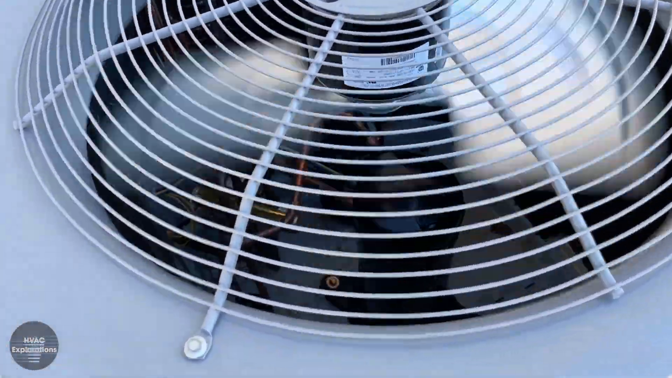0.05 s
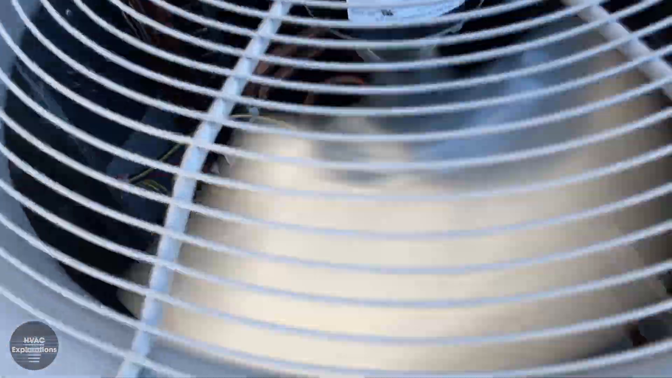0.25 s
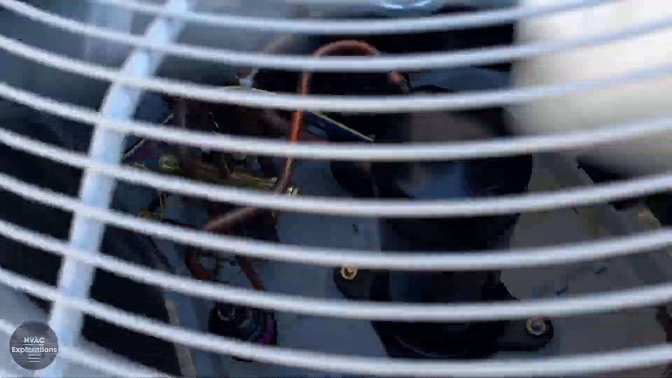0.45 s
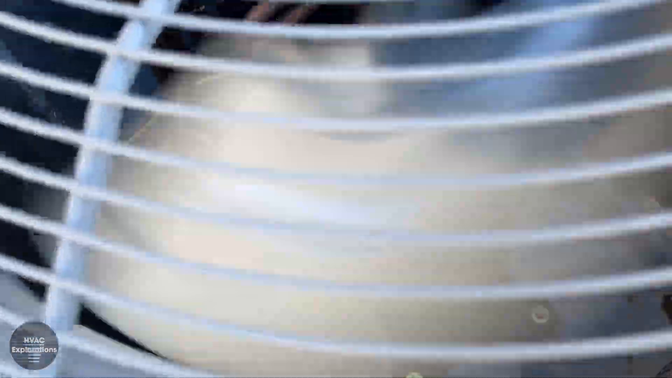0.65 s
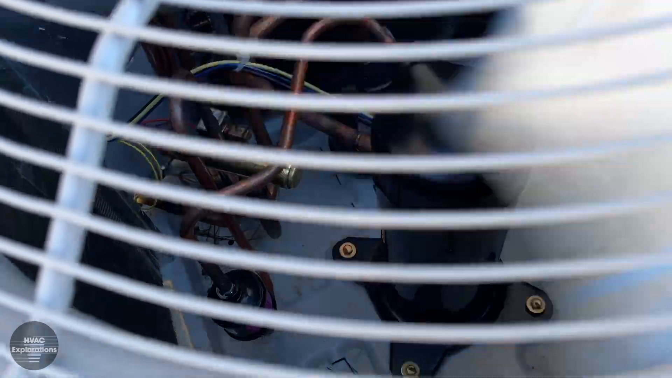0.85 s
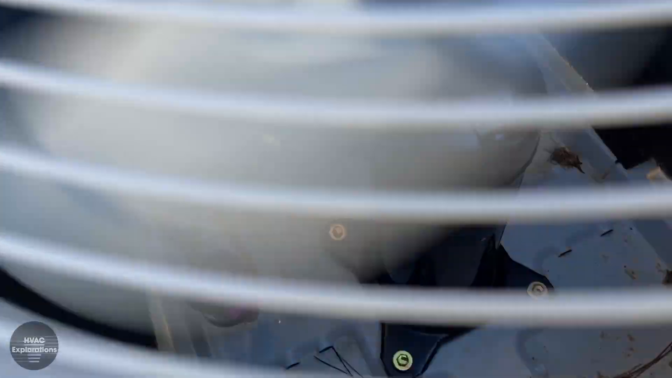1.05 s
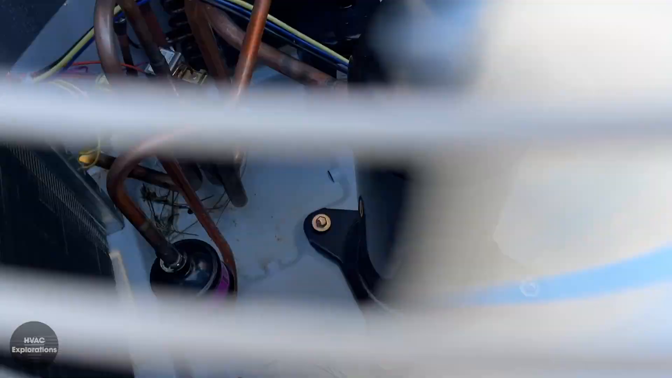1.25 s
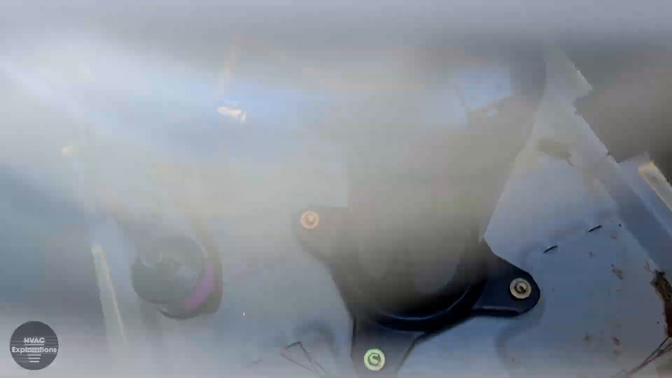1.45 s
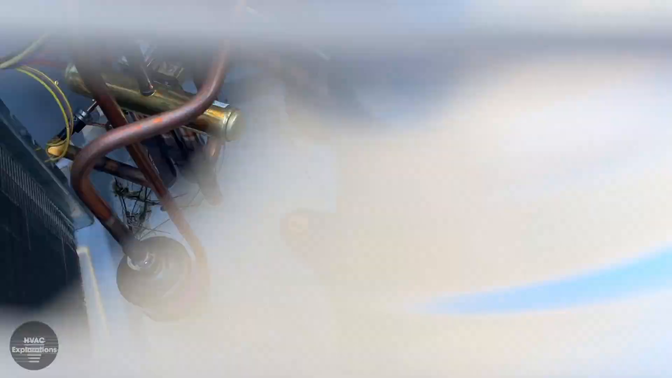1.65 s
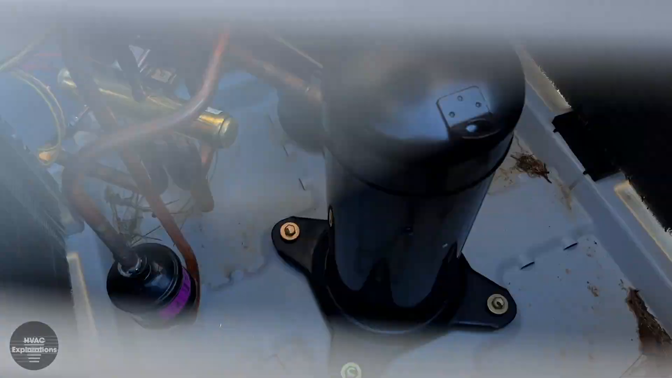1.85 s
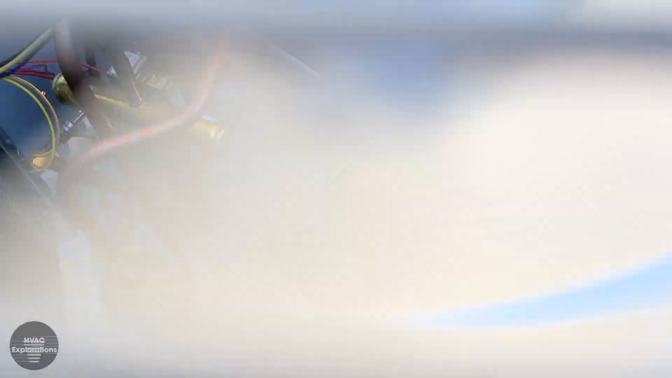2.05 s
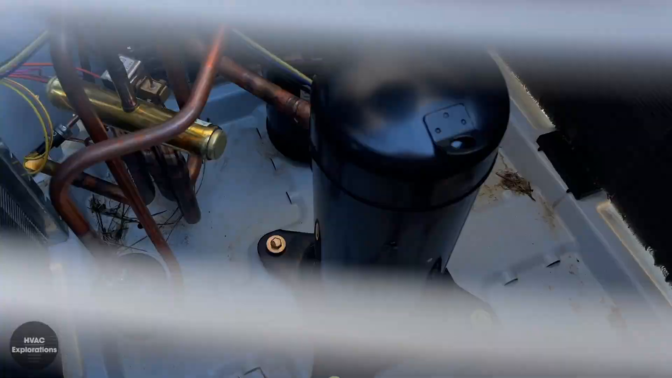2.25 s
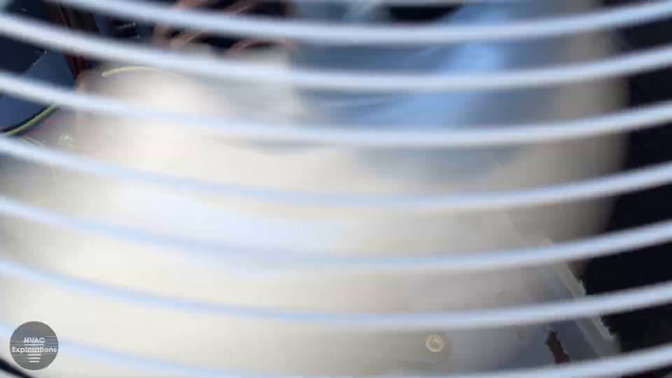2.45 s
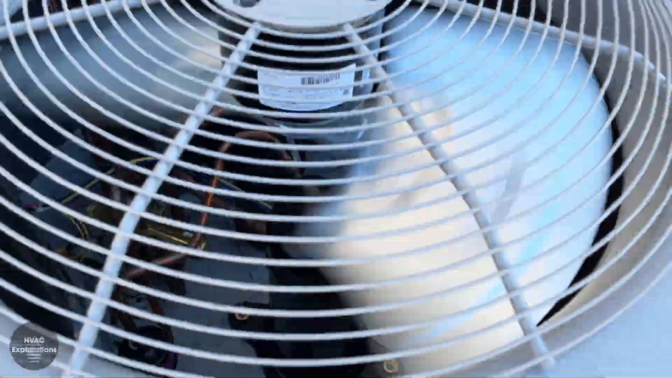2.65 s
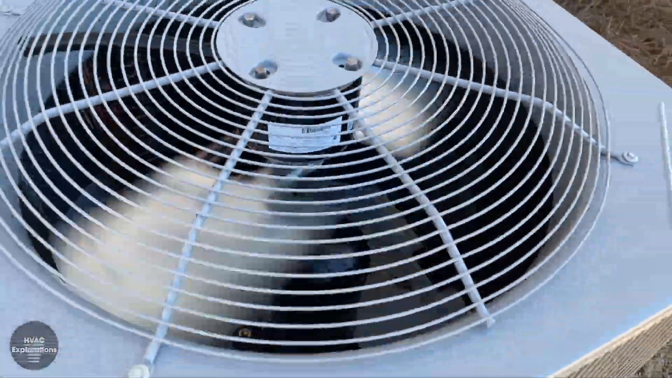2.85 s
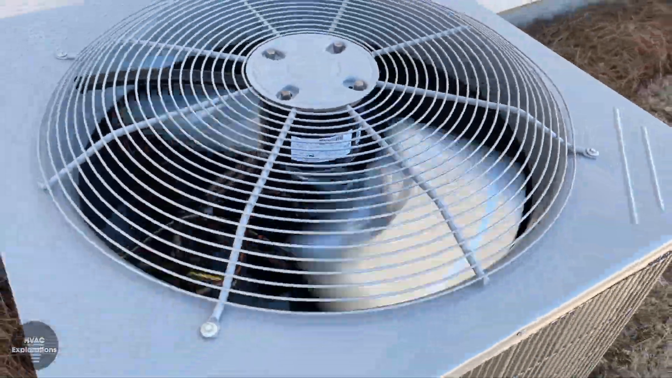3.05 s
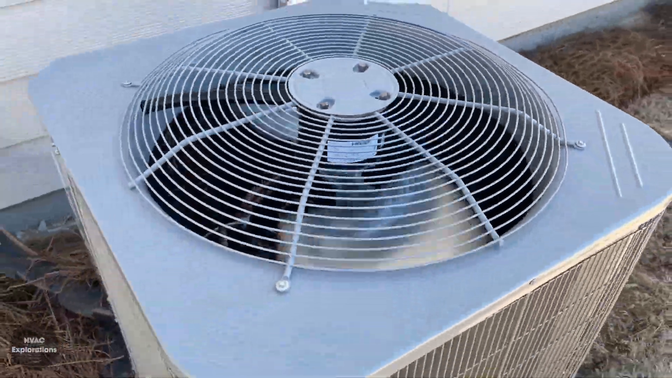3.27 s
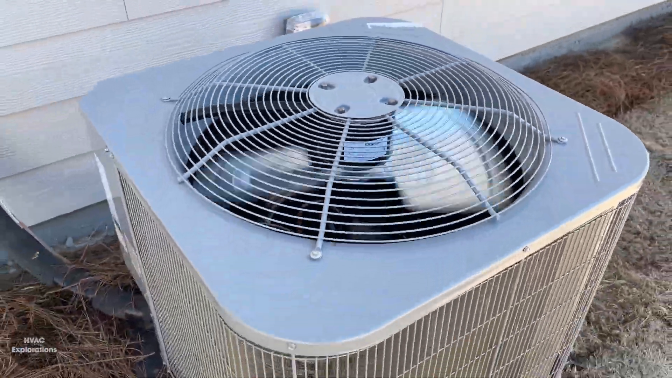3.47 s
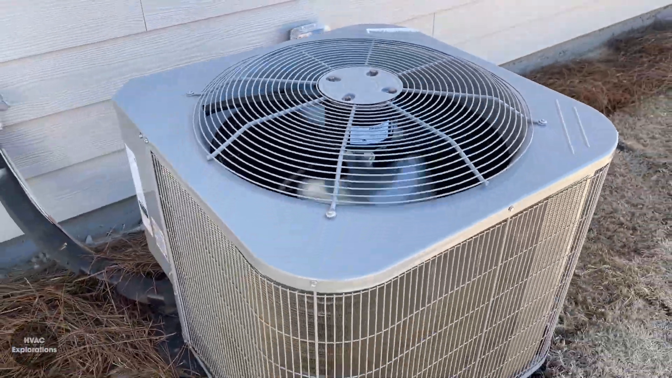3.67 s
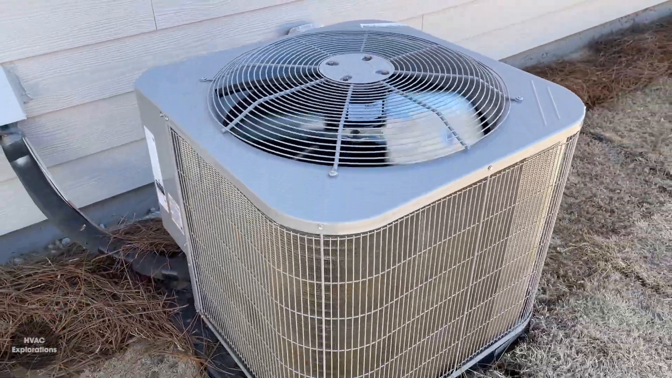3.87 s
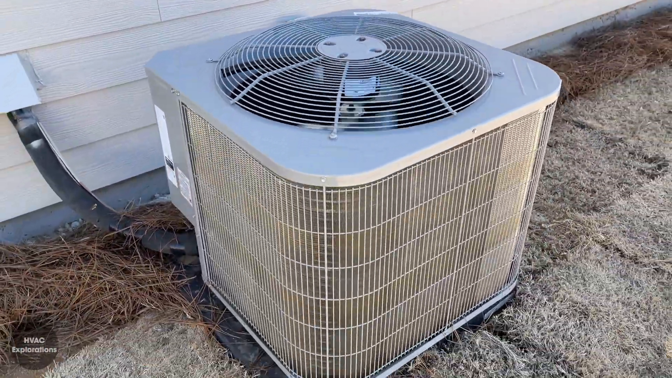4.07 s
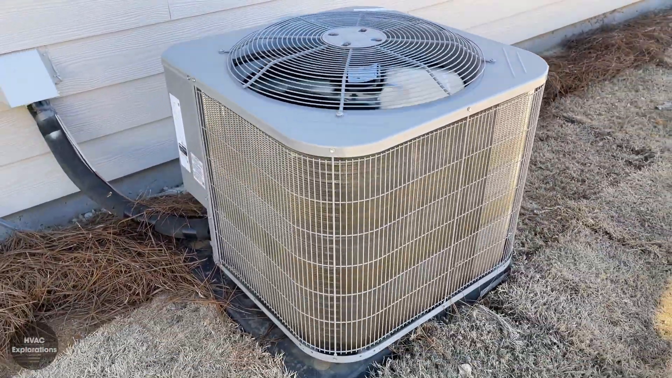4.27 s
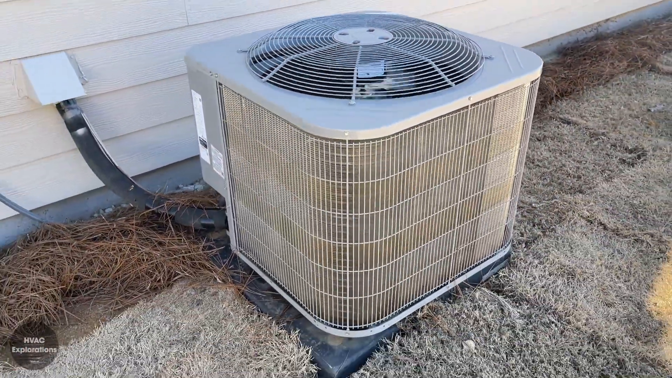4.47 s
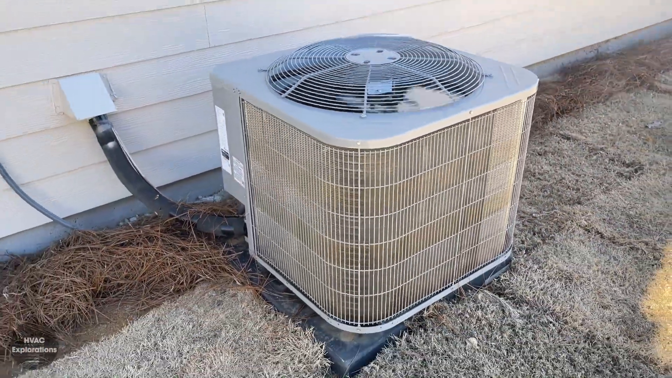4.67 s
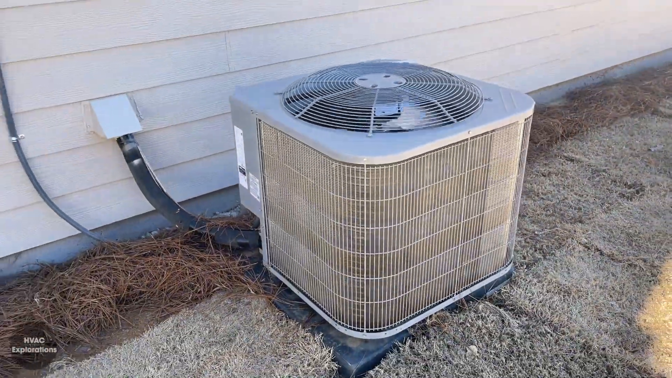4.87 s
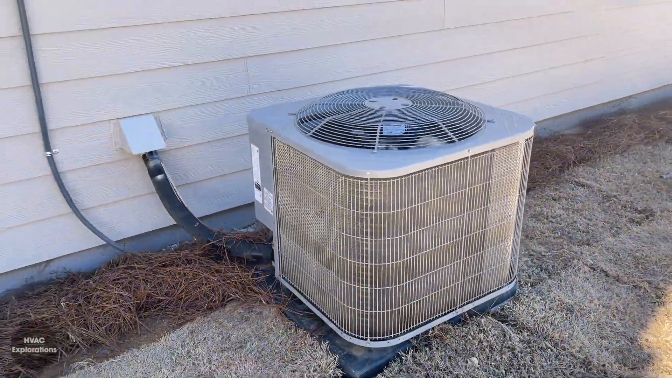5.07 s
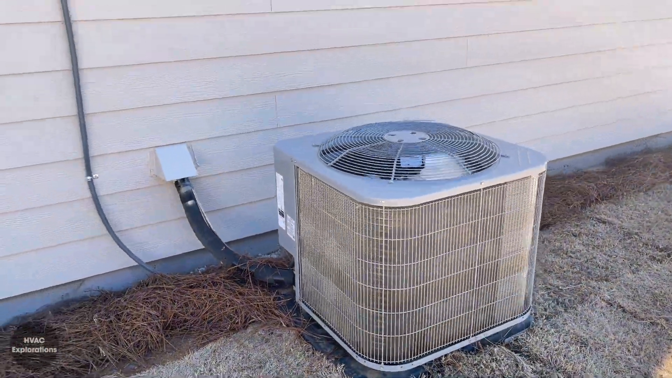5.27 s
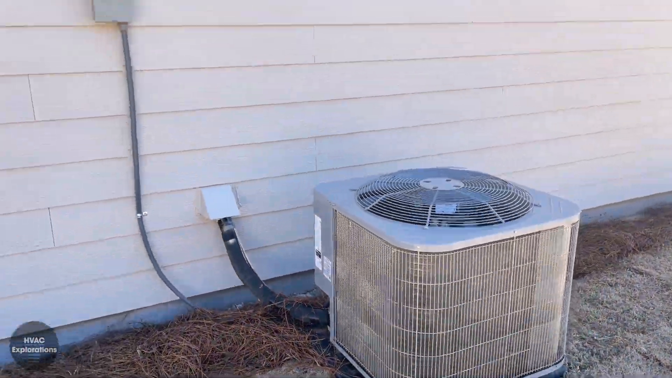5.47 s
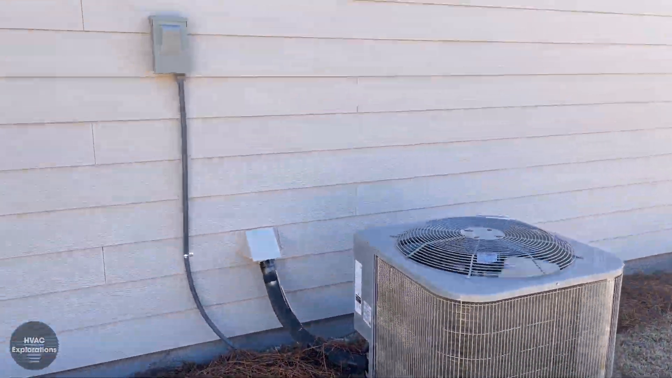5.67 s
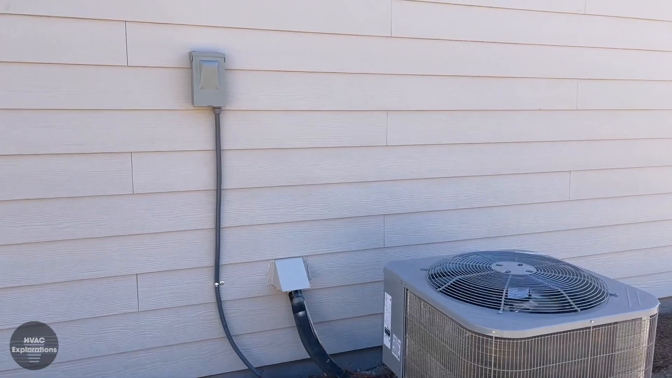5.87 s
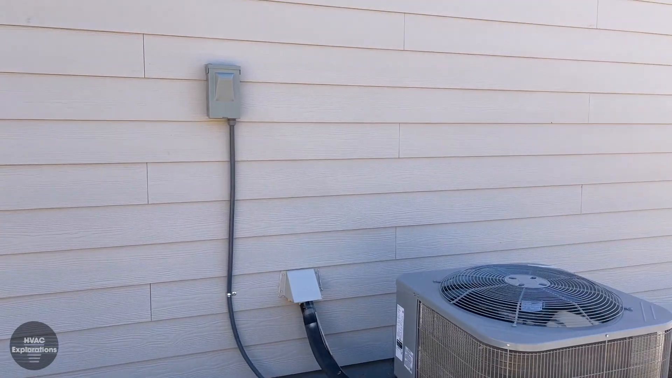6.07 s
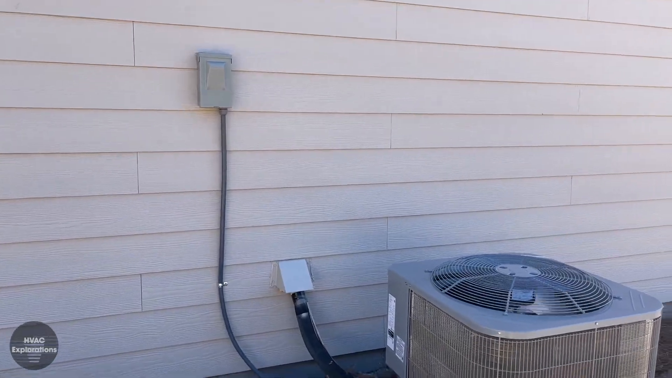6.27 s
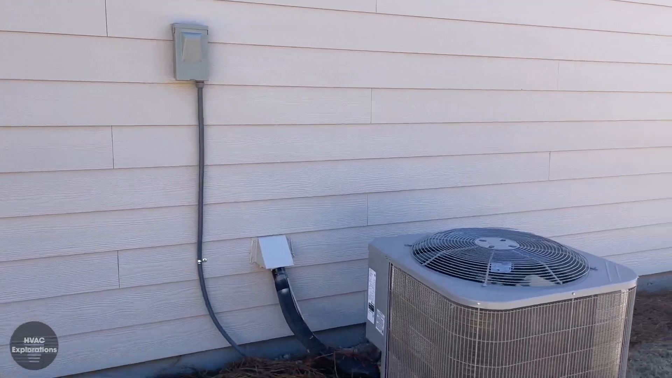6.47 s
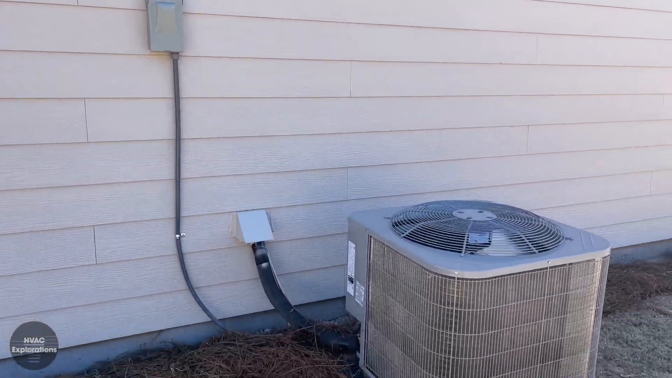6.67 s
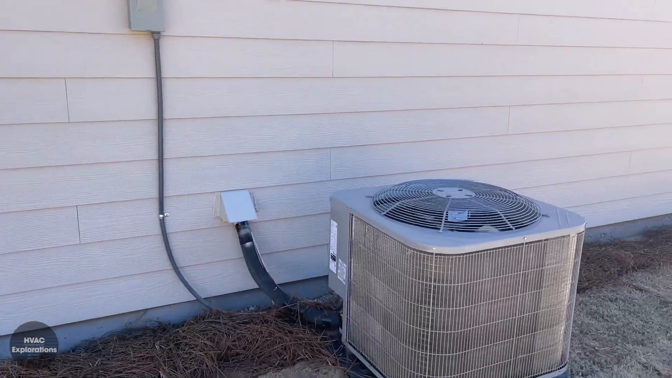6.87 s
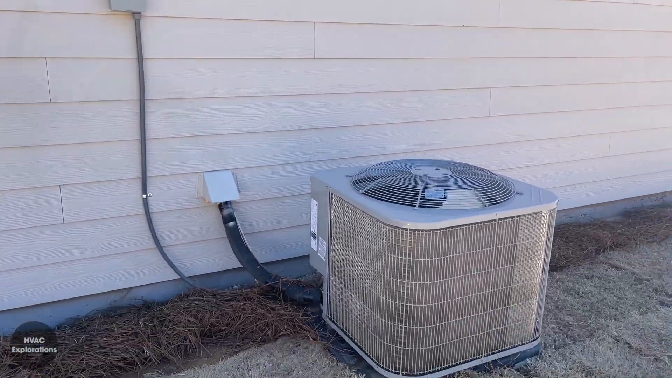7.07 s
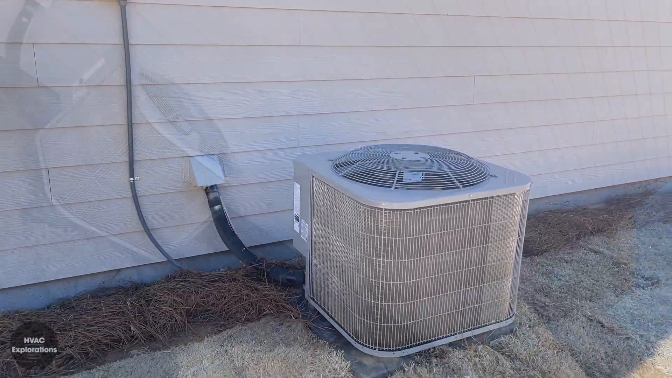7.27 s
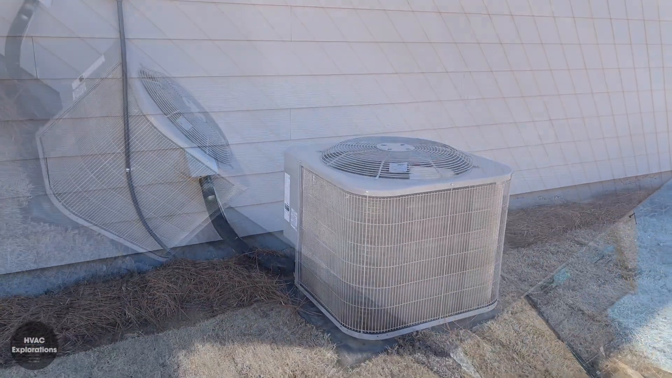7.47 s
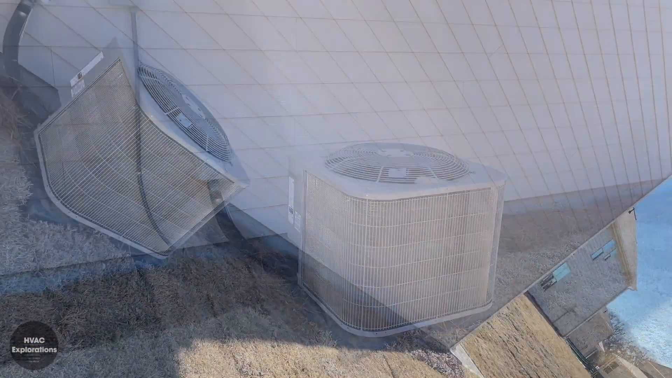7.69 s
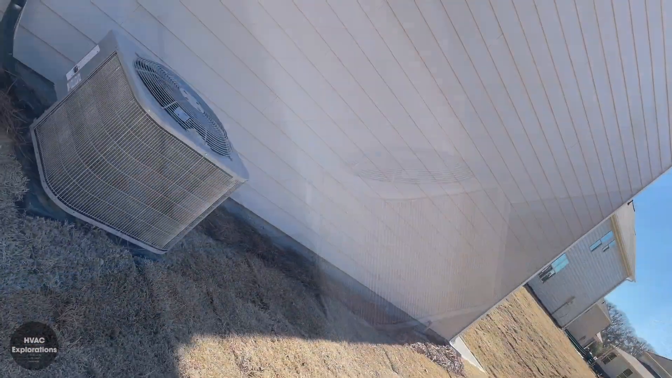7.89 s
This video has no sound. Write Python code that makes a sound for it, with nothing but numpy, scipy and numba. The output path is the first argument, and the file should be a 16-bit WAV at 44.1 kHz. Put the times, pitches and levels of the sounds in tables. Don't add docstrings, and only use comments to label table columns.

```python
import sys
import numpy as np
from scipy import signal
from scipy.fft import rfft, irfft, next_fast_len
from scipy.io import wavfile
from scipy.ndimage import uniform_filter1d
from numba import njit

SR = 44100
rng = np.random.default_rng(int(sys.argv[2]) if len(sys.argv) > 2 else 0)


def gain_from_decibels(decibels):
    exponent = np.asarray(decibels, float) / 20
    return 10 ** exponent


def generate_wav(signal):
    frames = np.transpose(np.atleast_2d(signal))
    scaled = np.clip(frames, -1, 1) * 32767
    pcm = np.round(scaled).astype(np.int16)
    wavfile.write(sys.argv[1], SR, pcm)


N = 349713
T = np.arange(N) / SR
SIZE = next_fast_len(N + SR // 4)
HZ = np.fft.rfftfreq(SIZE, 1 / SR) + 1e-3


def curve(table):
    s, *columns = np.transpose(table)
    return [np.interp(T, s, column) for column in columns]


def shape(table, hz):
    point_hz, value = np.transpose(table)
    return np.interp(np.log(hz), np.log(point_hz), value)


def bell(hz, centre_hz, spread):
    return np.exp(-(np.log(hz / centre_hz) / spread) ** 2)


def walk(rate):
    k = int(SR / rate)
    steps = np.repeat(rng.standard_normal(N // k + 1), k)
    return 1.79 * uniform_filter1d(uniform_filter1d(steps, k), k)[:N]


def band(hz, width):
    inside = np.abs(HZ - hz) < 3 * width
    draws = rng.standard_normal((2, inside.sum(), 2)) @ [1, 1j]
    bins = np.zeros((2, len(HZ)), complex)
    bins[:, inside] = np.exp(-((HZ[inside] - hz) / width) ** 2) * draws
    x = irfft(bins, SIZE)[:, :N]
    return x / np.sqrt(np.mean(x ** 2))


def colour(x, gain):
    return irfft(rfft(x, SIZE) * gain, SIZE)[..., :N]


def lowpass(x, hz, order):
    return colour(x, 1 / (1 + (HZ / hz) ** order))


def shares(x, unlike):
    return np.array([x, unlike * x])


@njit
def limiter(x, top, attack, release):
    gain, e = np.empty(len(x)), 0.
    for i in range(len(x)):
        e += (x[i] - e) * (attack if x[i] > e else release)
        gain[i] = min(1., top / (e + 1e-9))
    return gain


# start_s, distance_m,
# jet_depth (0-1), view (1 down the grille, 0 at the side, under 0 turned away)
PHONE_PLACE = [(0, 0.67, 0.016, 0.41), (.3, 0.59, 0.38, 0.8), (.6, 0.52, 0.5, 0.99),
               (.95, 0.63, 0.44, 0.94), (1.2, 0.54, 0.81, 1), (1.6, 0.39, 0.87, 0.69),
               (2.0, 0.5, 0.81, 0.67), (2.25, 0.7, 0.82, 0.78), (2.43, 0.83, 0.39, 1),
               (2.6, 0.94, 0.19, 0.49), (2.85, 1.16, 0.15, 0.27), (3.3, 0.99, 0.12, -0.29),
               (4.0, 1.75, 0.2, -0.13), (4.7, 2.18, 0.076, -0.0015), (5.9, 2.75, 0.072, 0.16),
               (7.25, 2.83, 0.05, 0.048), (7.5, 5.3, 0, 0.16), (7.75, 3.4, 0.0067, -0.076)]


def heard(db, power, jet_db, view_db):
    metres, jet, view = curve(PHONE_PLACE)
    return db - 20 * power * np.log10(metres) + jet_db * jet + view_db * view


# start_s, shift_turns
PATH_SHIFT = [(0, -.465), (1, -.434), (1.35, -.35), (2.2, -.31), (2.5, -.33), (3, -.33), (3.9, -.295),
              (5, -.37), (7, -.35), (7.93, -.35)]
BLADE_HZ = 37.685


def blade_passes():
    return BLADE_HZ * T + curve(PATH_SHIFT)[0]


# start_s, second_db, first_db, third_db
BLADE_THUMP = [(0.0, -24.5, -34, -30), (0.46, -15.5, -21, -32), (0.88, -16, -21, -27.5),
               (1.1, -14, -14, -21), (1.48, -8, -20, -16.5), (2.25, -12, -20, -15.5),
               (2.41, -13.5, -19, -22), (2.54, -22.5, -23, -33), (2.89, -31.5, -45, -33),
               (3.07, -27.5, -45, -30.5), (3.69, -34.5, -64, -36.5), (4.53, -41.5, -50, -39.5),
               (6.49, -50, -71, -42.5), (7.11, -47, -62, -39.5), (7.6, -41.5, -64, -52),
               (7.66, -40, -82, -49), (7.84, -44, -51, -49), (7.93, -49, -57, -42)]
# multiple, level_db
BLADE_EDGE = [(5, -1), (6, -9.5), (7, 2), (8, -4), (9, -2.5), (10, -9.5), (12, -11.5), (13, -18),
              (14, -7.5), (18, -6.5)]
# level_db at 1 m, distance_power, jet_gain_db, view_gain_db
BLADE_PLACE = (-35.5, 1.12, -0.3, -1.3)


def blades(turns):
    second, first, third = curve(BLADE_THUMP)
    edge, jet = heard(*BLADE_PLACE), curve(PHONE_PLACE)[1]
    late_dip_db = np.interp(T, [6.2, 6.6, 7.3, 7.6], [0, 5, 3, 0])
    orders = [(1, first + 3.5), (2, second + 3.5), (3, third + 3 - late_dip_db), (4, third - 14 + 6 * jet)]
    orders += [(k, edge + db) for k, db in BLADE_EDGE]
    lead = {1: 1.3 * ((jet - .55) / .3).clip(0, 1), 3: 1 - 2 * (2.2 * jet).clip(0, 1)}
    out = 0
    for k, db in orders:
        level = gain_from_decibels(db + np.clip(0.22 * k - .25, .15, 1.2) * walk(9))
        phase = 2 * np.pi * k * turns + lead.get(k, 1.9) + 0.063 * k * walk(12)
        out = out + np.sqrt(2) * level * np.cos(phase)
    return out


# start_s, left_minus_right_db, treble_shade_db, shade_hz
PHONE_AIM = [(0, 0.5, 0.5, 3600), (.5, 1.8, 3.5, 3730), (1.05, 2.5, 4.5, 3670), (1.4, 2.5, 7.5, 3300),
             (2.3, 2.5, 7, 3300), (2.6, 1, 2, 3650), (3.3, 0.06, -3.5, 3500), (4, 0, -3.5, 3450),
             (5.4, -0.5, -2, 3670), (5.75, -1.4, 1, 3500), (6.15, -2, 2, 3500), (6.45, 0.1, -1.5, 3920),
             (7.2, -0.6, -1, 2400), (7.5, 0.5, 1, 1620), (7.93, 1.3, 9, 1620)]


def late_shade():
    return curve(PHONE_AIM)[1] * (T > 3)


def swing(db):
    return np.interp(T, [4.6, 5.6], [0, db])


# pitch_hz, density_db (per Hz)
AIR_OUTLINE = [(18, -38), (30, 7.5), (103, -3.5), (158, -10), (261, -10.5), (420, -10.5), (877, -16.5),
               (1060, -20.5), (1450, -24), (1590, -26), (3020, -34), (4020, -35.5), (8800, -38.5),
               (11400, -65), (19400, -120)]
# pitch_hz, lift_db (over the colour at 8.8 kHz)
PORT_LIFT = [(9500, 7), (10200, 5), (11000, 3), (11600, -3), (12200, -10), (12800, -13), (13100, -21),
             (14500, -42)]
# pitch_hz, distance_power, jet_gain_db, view_gain_db
AIR_PLACE = [(45.3, 0.59, 7, 16), (110, 0.36, 19.5, 10), (243, 0.48, 25.5, -4), (520, 1.14, 2, 1),
             (820, 1, 1, -0.2), (1410, 1.01, 1, -2), (2400, 0.83, 3.5, 1.1), (3300, 0.79, 2, 6)]


def air(turns, shaft):
    out, common, metres = 0, walk(14), curve(PHONE_PLACE)[0]
    law_hz, *laws = np.transpose(AIR_PLACE)
    chop = np.cos(2 * np.pi * turns) + 0.96 * np.cos(4 * np.pi * turns)
    chop = chop * np.interp(metres, [1.15, 2.6], [.66, .21])
    shake = .07 * np.cos(2 * np.pi * shaft)
    dip_hz = 300 + 59 * metres
    dip_db = 14.5 * bell(metres, 1.77, 0.53)
    pan_db, shade_db, shade_hz = curve(PHONE_AIM)
    near = np.clip(pan_db, 0, None)
    shelf_db = .3 * (np.clip(shade_db, 0, None) * (T < 7.2) + 5 * (T > 4.5))
    top_loss_db = 0.3 * (metres - 2) + 0.43 * late_shade()
    for hz in 32 * 2 ** np.arange(0, 8.9, 1 / 3):
        db = heard(0, *(np.interp(np.log(hz), np.log(law_hz), law) for law in laws))
        db = db - db[3 * SR:7 * SR].mean()
        db = db - dip_db * bell(hz, dip_hz, 0.18)
        db = db - 6.5 * (hz < 130) - 3 * (hz < 60) - 0.3 * near * (hz < 240)
        db = db - shade_db * bell(hz, shade_hz, np.where(hz < shade_hz, .34, .62))
        db = db + swing(1.2) * bell(hz, 850, 0.22)
        db = db - top_loss_db * (hz > 10500)
        db = db + shelf_db * bell(hz, 2250, .2)
        depth = np.interp(np.log(hz), np.log([100, 400, 3000]), [.2, .55, .12])
        level = gain_from_decibels(db + .27 * common + .7 * walk(8)) * np.sqrt(hz)
        out = out + level * (1 + depth * chop + shake * (hz > 500)) * band(hz, .14 * hz)
    top_db = AIR_OUTLINE[-3][1]
    outline = list(AIR_OUTLINE[:-2]) + [(hz, db + top_db) for hz, db in PORT_LIFT]
    return gain_from_decibels(-56) * colour(out, gain_from_decibels(shape(outline, HZ)) / (1 + (48 / HZ) ** 6))


# level_db at 1 m, distance_power, jet_gain_db, view_gain_db
WAKE_PLACE = (-37, 0.5, 6.5, 7.5)


def wakes():
    chance = rng.random((150, 3)) - .5
    passes = np.arange(len(chance)) + .8 + 0.126 * chance[:, 0]
    when = np.interp(passes, blade_passes(), T)
    db = np.interp(when, T, heard(*WAKE_PLACE)) + 4 * chance[:, 1]
    db = db - 3 * np.clip(when - 2, 0, None) ** 2
    return list(zip(when, db, 430 * 2 ** (0.81 * chance[:, 2])))


# start_s, peak_db, pitch_hz
PORT_GUSTS = [(.38, -9.5, 430), (.39, -12, 242), (.398, -8, 139), (.574, -4, 143), (.589, -6.5, 520),
              (.6, -7.5, 300), (.61, -2.5, 195), (.62, -10, 472), (.826, -3.5, 576), (.829, -2.5, 335),
              (.99, -10.5, 326), (1.122, -7.5, 508), (1.135, -2, 134), (1.329, -1.5, 338),
              (1.358, -8.5, 557), (1.372, -12, 416), (1.409, -7, 617), (1.461, -5, 343),
              (1.481, -5.5, 400), (1.519, -9, 727), (1.592, -5.5, 365), (1.645, -10, 675),
              (1.806, -11, 258), (1.841, -16, 286), (1.934, -10, 400), (1.971, -4.5, 286),
              (2.017, -2, 477), (2.066, -16, 593), (2.118, -5, 550), (2.2, -9, 330), (2.345, -10, 290),
              (2.44, -11, 114)]
# start_s, peak_db, pitch_hz
FURTHER_GUSTS = [(.642, -15, 440), (1.039, -20, 358), (1.09, -14.5, 312), (1.178, -11.5, 400),
                 (1.189, -13, 378), (1.223, -7, 398), (1.252, -9, 280), (1.521, -9, 234), (1.548, -5, 260),
                 (1.565, -9, 490), (1.628, -4.5, 278), (1.663, -4, 322), (1.729, -17, 238), (1.753, -18, 296),
                 (1.912, -6.5, 288), (1.985, -5.5, 340), (2.149, -10, 345), (2.215, -8.5, 400),
                 (2.232, -9, 344), (2.262, -8.5, 170), (2.285, -27, 315), (2.366, -16.5, 340),
                 (2.396, -20, 475), (2.443, -18, 346)]
# start_s, peak_db, pitch_hz
LOW_BUMPS = [
    (.392, -9, 61),
    (2.44, -9, 74.5),
    (2.655, -14, 72),
    (4.41, -23, 88.5),
    (6.487, -29, 900),
]


def gusts():
    t = np.arange(SR // 8) / SR
    out, edges = np.zeros((2, N)), np.zeros((2, N))
    loose = list(PORT_GUSTS) + list(FURTHER_GUSTS) + list(LOW_BUMPS)
    rows = loose + wakes()
    noises = rng.standard_normal((len(rows), 2, len(t)))
    for number, ((s, db, hz), noise) in enumerate(zip(rows, noises)):
        roughness = .39 if number < len(loose) else 1.2
        t60 = 0.02 + 3.5 / hz
        sos = signal.butter(2, [0.14 * hz, 1.63 * hz], "band", fs=SR, output="sos")
        rough = signal.sosfilt(sos, noise)
        flutter = np.sin(2 * np.pi * hz * t * (1.12 - 0.39 * t / t60).clip(.7))
        body = shares(flutter, .3) + roughness * rough / rough.std()
        fade = t / (t60 / 8)
        i = int(s * SR)
        out[:, i:i + len(t)] += gain_from_decibels(db) * body * fade * np.exp(1 - fade)
        edges[:, i:i + len(t)] += gain_from_decibels(db - 12.5) * noise[::-1] * np.exp(-t / 0.0036)
    return lowpass(out, 1100, 4) + lowpass(edges, 2600, 4)


# start_s, peak_db
SHARP_TICKS = [(.808, -22), (.99, -17), (1.124, -16), (1.36, -18), (1.385, -19), (1.521, -12), (1.645, -14),
               (1.935, -13), (1.947, -18), (2.066, -14), (2.12, -14), (6.488, -27)]


def ticks():
    out, t = np.zeros((2, N)), np.arange(SR // 20) / SR
    for s, db in SHARP_TICKS:
        i = int(s * SR)
        out[:, i:i + len(t)] += gain_from_decibels(db) * rng.standard_normal((2, len(t))) * np.exp(-t / .003)
    return colour(out, 1 / (1 + (HZ / 3500) ** 2) / (1 + (400 / HZ) ** 2))


# multiple (of the turn rate), level_db
TURN_ORDERS = [(1, 6.5), (2, -2), (4, 7.5), (9, -28), (11, -12), (12, 3), (13, 0), (14, -9.5), (15, 0.5),
               (17, -13), (20, -8), (21, -7), (25, -7.5)]
# multiple (of the turn rate), level_db
VALVE_WHINE = [(54, -26), (55, -27), (68, -24), (69, -27), (70, -22), (71, -27), (93, -25), (97, -27),
               (98, -28), (104, -24), (105, -25), (109, -26), (119, -24)]
# pitch_hz, width_hz, level_db
SHELL_RINGS = [
    (4120, 90, -26),
    (6150, 300, -13),
    (3200, 250, -29),
]
# level_db at 1 m, distance_power, jet_gain_db, view_gain_db
HUM_PLACE = (-47, 0.64, 4, -3)
WHINE_PLACE = (-40.5, 0.28, -2, 7.5)


def compressor(turns):
    tones = whine = shell = 0
    shade = late_shade()
    for k, db in TURN_ORDERS:
        db = db + 1.8 * walk(6.4) + 3.4 * swing(1.2) * (14 <= k <= 15) - 0.59 * shade * (k > 16)
        tones = tones + gain_from_decibels(db) * np.cos(2 * np.pi * (k * turns + 0.34 * rng.random()))
    for k, db in VALVE_WHINE:
        db = db - 1.2 * shade + 2.2 * walk(12) + 1.5 * walk(4) - 1
        whine = whine + gain_from_decibels(db) * np.cos(2 * np.pi * k * turns + .45 * walk(25))
    knock = np.exp(-(turns % 1) / 0.24)
    for hz, width, db in SHELL_RINGS:
        level = gain_from_decibels(db + 1.4 * walk(2.04) - .5 * curve(PHONE_AIM)[1])
        shell = shell + level * knock * band(hz, width)
    body = gain_from_decibels(heard(*HUM_PLACE) + 3.5) * (shares(tones, .3) + gain_from_decibels(4.5) * shell)
    return body + gain_from_decibels(heard(*WHINE_PLACE)) * shares(whine, .3)


# start_s, pitch_hz, level_db
ENGINE_REV = [
    (6.2, 118.6, -33),
    (6.5, 118.8, -39),
    (6.8, 125.4, -36),
    (7.1, 135, -36.5),
    (7.4, 143, -38),
    (7.5, 146, -45),
]


def engine():
    hz, db = curve(ENGINE_REV)
    on = np.interp(T, [6.2, 6.5, 7.38, 7.46], [0, 1, 1, 0])
    phase = 2 * np.pi * np.cumsum(hz) / SR + .22 * walk(26)
    return np.sqrt(2) * on * gain_from_decibels(db + 1.2 * walk(17)) * np.sin(phase)


def lean(db):
    return np.tanh(db * np.log(10) / 40)


# pitch_hz, side_minus_mid_db
PORT_UNLIKE = [(30, -22), (70, -15.5), (300, -25), (600, -15.5), (1200, -16.5), (2100, -10), (3800, -8.5),
               (5400, -5), (6300, -21), (7200, -0.5), (8250, -22)]
# pitch_hz, half_angle_degrees
PORT_SLIP = [(8850, 0), (9200, 45), (10250, 90), (10700, 114), (11600, 158), (11800, 180)]
# pitch_hz, lead_radians (under 0
LEFT_LEAD = [(60, .42), (500, .35), (850, .1), (1600, -1.2), (2200, -.6), (2800, 1.2), (4500, .75),
             (7500, .75)]
# start_s, left_minus_right_db
TREBLE_PAN = [(0, 0.5), (.75, 1.2), (1.2, 2), (2.3, 1.6), (3.2, .7), (4.2, -.1), (5.2, -0.3), (5.8, 1.7),
              (6.2, 2.5), (6.8, 0), (7.3, 1), (7.93, 1.5)]


def ports(direct, other, pan_db):
    slip = np.radians(np.interp(HZ, *np.transpose(PORT_SLIP)))
    null = np.abs(np.cos(slip))
    mid = colour(direct, np.cos(slip) * (null > .14) * (HZ < 13100))
    null_loss = (1.5 * walk(30) + .5).clip(0, 1)
    edge_loss = (1.2 * walk(35) + .2 + .12 * late_shade()).clip(0, 1)
    mid -= colour(mid, null < .27) * null_loss + colour(mid, HZ > 12650) * edge_loss
    side = colour(direct, .9j * np.sin(slip)) + colour(other, 0.15 * np.sin(slip))
    unlike = gain_from_decibels(shape(PORT_UNLIKE, HZ))
    side += colour(other, unlike * (HZ > 1800))
    side += gain_from_decibels(3.1 * np.abs(pan_db)) * colour(other, unlike * (HZ <= 1800))
    low_lean = 1.23 + .5 * (HZ > 400) - bell(HZ, 200, np.sqrt(0.45))
    side += colour(direct, (HZ < 2800) * low_lean) * lean(pan_db)
    side += colour(direct, (HZ >= 2800) * (HZ < 8200)) * 1.7 * lean(curve(TREBLE_PAN)[0])
    side += colour(direct, HZ < 300) * lean(-0.9)
    lead = 1j * np.tan(shape(LEFT_LEAD, HZ) / 2) * (HZ < 8200)
    side += colour(direct, lead * (HZ < 2400)) * np.clip(pan_db / 1.1, .05, .85)
    side += 0.79 * colour(direct, lead * (HZ >= 2400))
    top = gain_from_decibels(np.interp(HZ, [12400, 13300, 14200], [-8, 7, 12])) * (HZ > 12400) * (HZ < 14200)
    patches = (1.4 * walk(25.3) + 0.65 - 0.13 * curve(PHONE_AIM)[1]).clip(0, 1)
    side += colour(other, top) * patches
    return np.array([mid + side, mid - side])


def scene():
    turns = blade_passes()
    shaft = 58.86 * T + .003 * walk(6)
    eddies = gusts()
    steady = air(turns, shaft) + shares(blades(turns), .5)
    duck = limiter(np.abs(eddies[0]), 0.3, 0.0084, 0.0006)
    steady += (duck - 1) * lowpass(steady, 700, 4)
    direct, other = steady + eddies + ticks() + compressor(shaft) + shares(engine(), .5)
    return ports(direct, other, curve(PHONE_AIM)[0])


def band_limit(x):
    return signal.sosfilt(signal.butter(12, 14300, fs=SR, output="sos"), x)


def record(dry):
    bass = lowpass(dry, 1500, 4)
    gain = limiter(np.abs(bass).max(axis=0), 0.86, 0.0048, 0.0054)
    rounded = lowpass(np.tanh(0.84 * bass * gain) / 1.07, 2500, 6)
    out = dry - bass + rounded
    out = out / (1 + (np.abs(out) / .97) ** 8) ** (1 / 8)
    return band_limit(out)


dry = scene()
out = record(dry)
generate_wav(out)
```